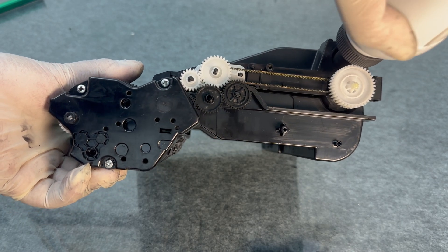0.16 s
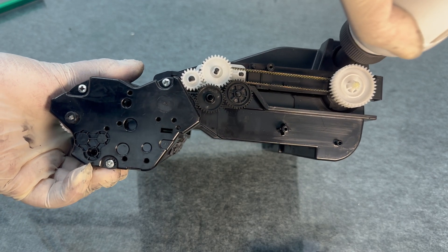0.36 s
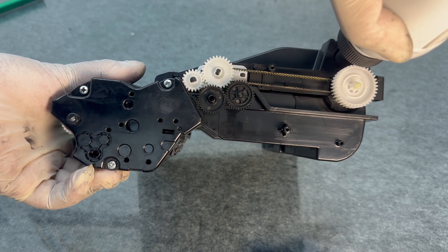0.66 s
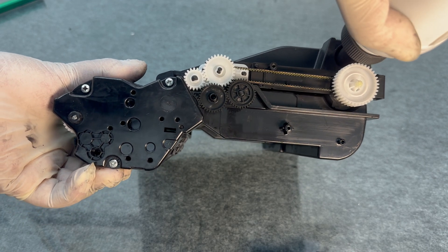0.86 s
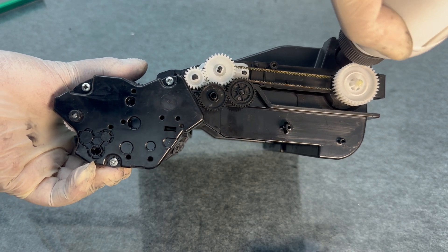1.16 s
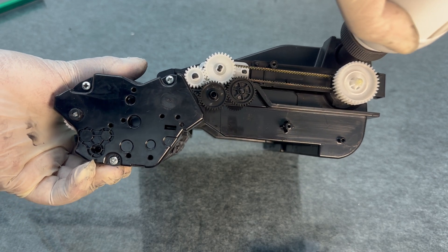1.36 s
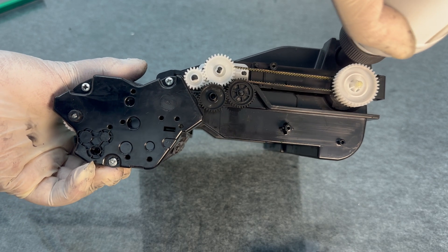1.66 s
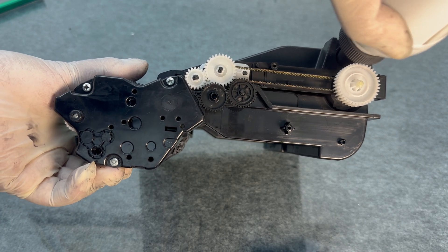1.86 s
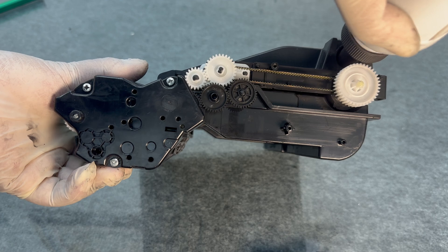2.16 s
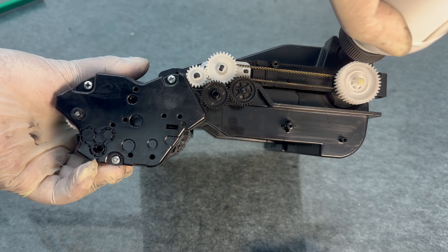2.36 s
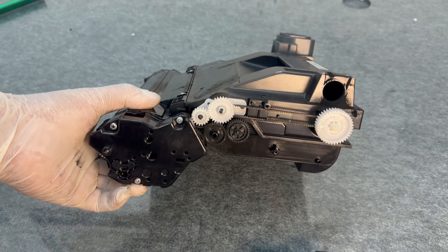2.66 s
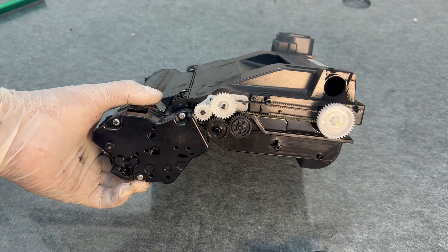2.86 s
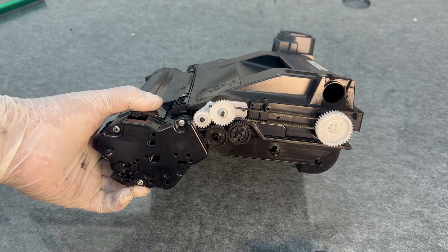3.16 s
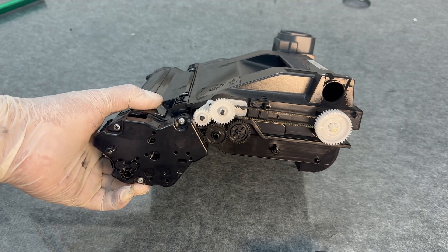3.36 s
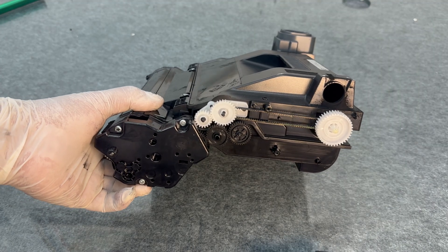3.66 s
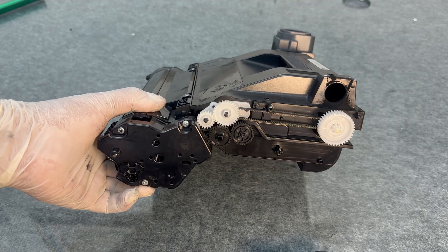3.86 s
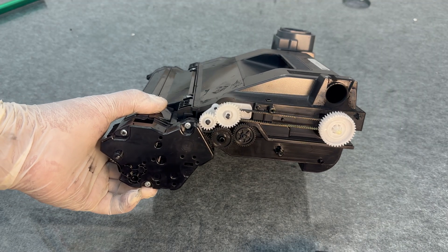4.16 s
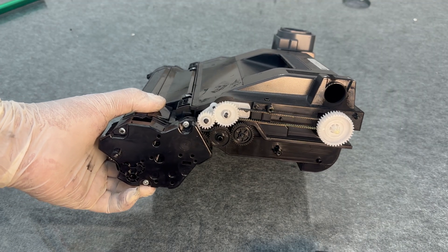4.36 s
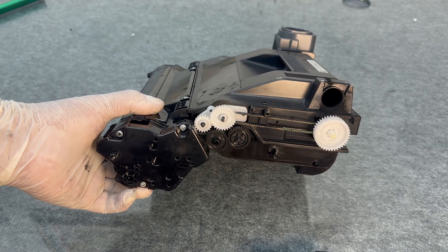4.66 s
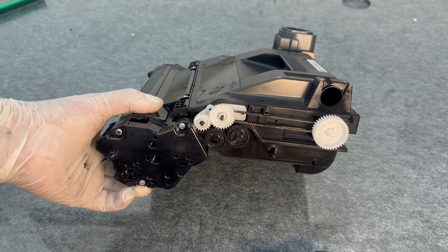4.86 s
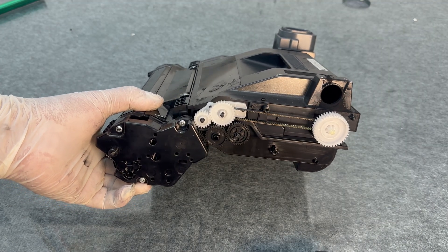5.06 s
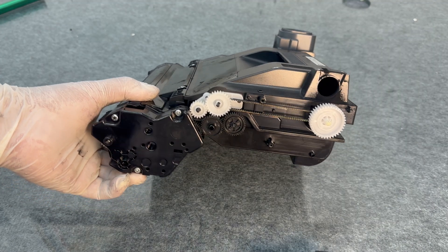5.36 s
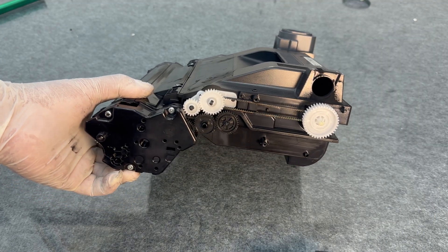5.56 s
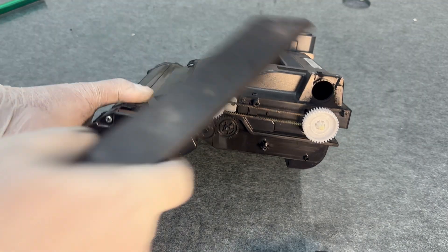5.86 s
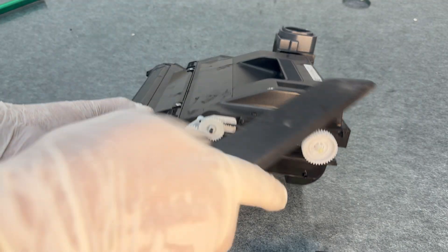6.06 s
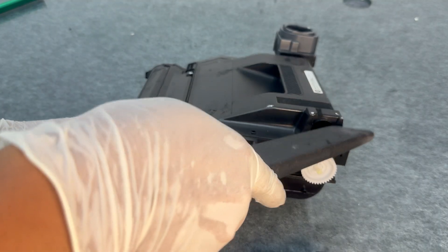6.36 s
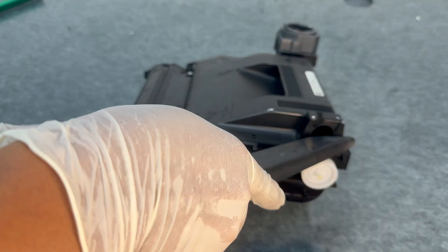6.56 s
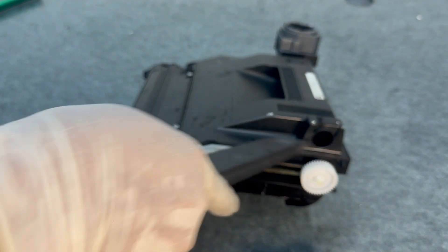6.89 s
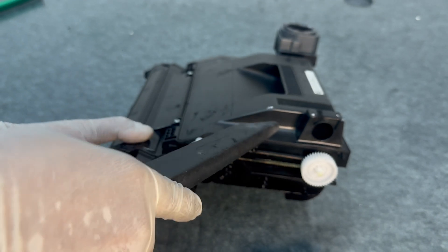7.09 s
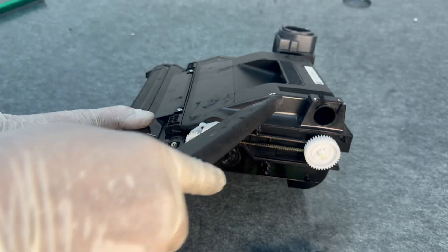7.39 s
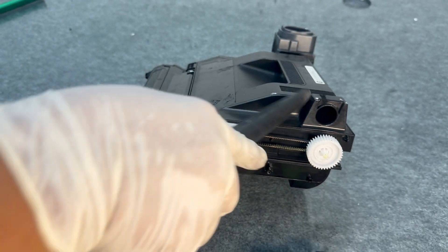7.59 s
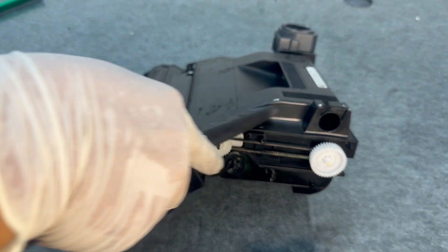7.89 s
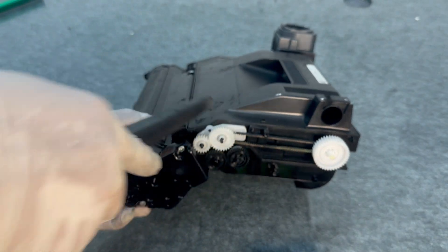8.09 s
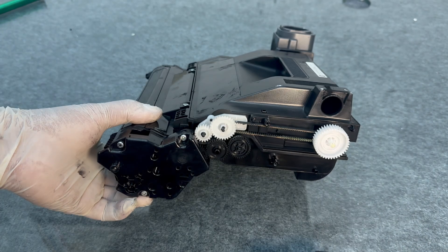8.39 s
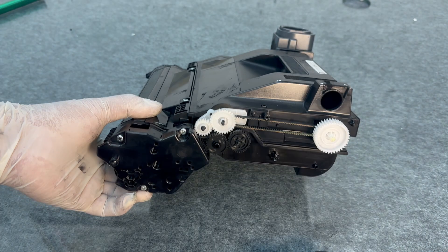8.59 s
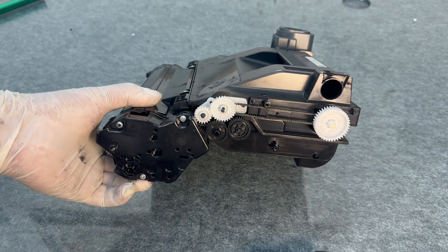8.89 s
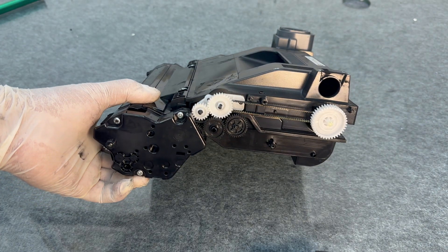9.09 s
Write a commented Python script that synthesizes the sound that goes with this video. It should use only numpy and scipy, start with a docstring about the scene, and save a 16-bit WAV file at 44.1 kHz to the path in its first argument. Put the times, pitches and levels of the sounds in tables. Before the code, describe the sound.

Light, quick plastic knocks of a bottle being shaken, followed by a small vacuum clicking on and running with rushing air.

```python
"""First a plastic toner bottle is shaken into a printer cartridge in a small room: each stroke knocks
it against the filler neck and it falls back, mostly more softly. A few dull handling bumps follow.
Then a small vacuum cleaner clicks on; its motor whines up to speed and air rushes through the hose.
Its narrow nozzle passes twice close over the cartridge, hissing and drawing in powder.
One last bump comes near the end, with the motor still running."""
import sys
import numpy as np
from scipy import signal
from scipy.fft import rfft, irfft, next_fast_len
from scipy.io import wavfile
from scipy.ndimage import uniform_filter1d, map_coordinates

SR = 44100
rng = np.random.default_rng(int(sys.argv[2]) if len(sys.argv) > 2 else 0)


def wav_out(sig):
    """Save sig, one row per channel (or a flat mono array), as 16-bit PCM at SR to the path in sys.argv[1]."""
    wavfile.write(sys.argv[1], SR, np.round(np.clip(np.atleast_2d(sig).T, -1, 1) * 32767).astype(np.int16))


N = 407043

# tones of the motor's whine: cycles_per_turn, speeding_up_db, full_speed_db, roughness_rad
MOTOR_TONES = [(2, -57.5, -70, .15), (2.612, -59, -63, .15), (3, -61, -64, .1), (7, -68, -73, .8),
               (9, -57, -64, .75), (12, -60, -72, 1.1), (13, -70, -70, 1.2)]
# resonances of the motor housing: pitch_hz, width_hz, boost_db
HOUSING_PEAKS = [(510, 30, 14), (632, 49, 10.5), (864, 19, 11), (906, 61, 7), (1710, 130, -1),
                 (2330, 120, 5), (2676, 200, 9.5), (2990, 410, 4.5), (3265, 48, 9), (3326, 47, 7),
                 (4170, 130, 9.5)]
# loud and dead spots that the hum passes on its way up: pitch_hz, width_hz, boost_db
HUM_PEAKS = [(200, 90, -22), (292, 45, 6), (333, 9, -5), (348.5, 12, 10), (362.3, 4, 8.5),
             (369.3, 4.5, -17), (372.7, 1.6, 2.5)]
# how near the nozzle is, as a change in loudness: time_s, level_db
NEARNESS = [(4.3, -2.5), (5.05, -1), (5.45, -4), (5.9, -2.5), (6.5, 3.5), (7.05, 0), (7.55, 0),
            (8.05, -0.1), (8.6, -5), (9.23, -6.5)]
# how far the nozzle points at the listener: time_s, share_0_to_1
FACING = [(5.6, 0.3), (6.15, 0.95), (6.9, 0.23), (7.1, 0.7), (7.6, 0.74), (8.2, 0.58), (9.23, 0.3)]
# roar of the exhaust: pitch_hz, level_db
EXHAUST_ROAR = [(40, -22), (100, -12.5), (170, -2.5), (240, -3), (320, -0.5), (450, 3), (600, -3),
                (780, -4.5), (1050, -2), (1400, -8.5), (2200, -25.5), (5000, -66)]
# hiss of the hose: pitch_hz, level_db
HOSE_HISS = [(600, -38), (1400, -2.5), (1900, 1.5), (2700, 2.5), (3400, 1), (4400, 0.5), (5800, -3.5),
             (7000, -8), (9000, -21.5), (15000, -49)]
# resonances along the nozzle tube: pitch_hz, width_hz, boost_db
TUBE_PEAKS = [(1070, 350, -18), (1787, 340, 10.5), (2620, 700, 4), (3400, 610, 7.5), (4130, 300, 7),
              (5300, 1300, 7), (5960, 440, 3), (7500, 400, -3), (8400, 380, -25)]
# fizz of the nozzle: pitch_hz, level_db
NOZZLE_FIZZ = [(3000, -23), (6500, -1), (8500, -2), (10500, -7.5), (13000, -16.5), (15700, -54)]
# thin, very high hiss of the nozzle's slot: pitch_hz, level_db
SLOT_HISS = [(7000, -19), (10500, -7), (12000, 2), (14500, 1), (15700, 1)]
# rise and fall of the highest hiss: time_s, level_db
TREBLE = [(4.24, -86), (5.03, -64.5), (5.45, -68), (6.15, -52.5), (6.55, -60), (7.3, -59.5), (8.05, -54.5),
          (8.55, -64), (9.23, -76.5)]
# the nozzle closes on the filler hole, then on the ribs: start_s, length_s, level_db, gulp_db
PASSES = [(6.635, 0.28, -34, 3), (7.695, 0.29, -34, 7)]
# air rushing over the filler hole: pitch_hz, level_db
HOLE_AIR = [(600, -45), (1080, -4.5), (1420, -18), (1850, -15), (2300, -16), (3400, 0), (4200, -7.5),
            (5700, 2.5), (7000, -6), (8400, -9), (11000, -12.5), (15500, -18)]
# nozzle resonances over the hole: pitch_hz, width_hz, boost_db
HOLE_PEAKS = [(1830, 250, 12.5), (2620, 260, 5), (3330, 250, 0.5), (5200, 160, 4), (5500, 200, -8),
              (8060, 320, 3.5), (8700, 360, -1)]
# air rushing over the ribs: pitch_hz, level_db
RIBS_AIR = [(550, -40), (950, -0.5), (1500, -6), (2200, -2.5), (2560, -4), (2950, -3.5), (3800, 2),
            (4700, 3.5), (6400, -0.5), (9000, -9), (15500, -30)]
# nozzle resonances over the ribs: pitch_hz, width_hz, boost_db
RIBS_PEAKS = [(2180, 400, 7.5), (2840, 430, 6.5), (3900, 400, 5.5), (4700, 280, 3), (5760, 280, 0.5)]
# brief whistles of air: middle_s, length_s, pitch_hz, width_hz, level_db
WHISTLES = [(4.22, 0.09, 1780, 80, -52.5), (4.256, 0.12, 2250, 120, -55), (6.444, 0.53, 5780, 300, -48),
            (6.662, 0.13, 5200, 240, -37.5), (6.731, .25, 5800, 240, -38), (6.779, 0.14, 7530, 350, -37.5),
            (6.78, 0.18, 8650, 350, -40.5), (7.729, 0.14, 3670, 480, -30),
            (7.71, 0.053, 4650, 261.7, -33.5), (7.86, .26, 3740, 240, -47)]
# snaps of the switch and the motor's brushes: start_s, level_db
SWITCH_SNAPS = [(4.091, -50.5), (4.11, -49.5), (4.126, -60)]
# tone colour of those snaps: pitch_hz, level_db
SPARK = [(600, 9.5), (1700, 2), (3500, 1), (6000, 0.5), (9000, -9.5), (15500, -28)]
# strokes of the bottle: start_s, knock_db, fall_back_after_s, fall_back_db
STROKES = [(0.119, -60, 0.075, -49.5), (0.268, -37.5, 0.067, -47), (0.405, -43, 0.065, -56.5),
           (0.53, -42.5, 0.06, -62), (0.662, -43, 0.056, -56.5), (0.79, -46, 0.038, -71),
           (0.919, -50, 0.047, -63), (1.048, -48, 0.045, -52), (1.159, -43, 0.06, -50.5),
           (1.292, -39.5, 0.07, -55), (1.427, -39.5, 0.063, -52.5), (1.556, -40.5, 0.051, -58),
           (1.827, -41, 0.065, -55.5), (1.955, -39.5, 0.076, -58), (2.089, -39.5, 0.066, -47),
           (2.226, -38, 0.072, -52.5), (2.36, -40, 0.07, -56)]
# the bottle neck slips in the hole: start_s, squeak_db, scrape_db
SLIPS = [(0.059, -53.5, -63.5), (0.086, -49, -64), (1.012, -70, -59), (1.031, -53.5, -59),
         (1.747, -56, -59.5), (1.816, -51, -54)]
# ringing of the bottle wall (a fade is a drop of 60 dB): pitch_hz, level_db, fade_s
BOTTLE_WALL = [(890, -6, 0.038), (1266, -11, 0.031), (1545, -8.5, 0.019), (2013, 0.5, 0.016),
               (2137, 3, 0.014), (2374, 3, 0.012), (2770, -7.5, 0.0075)]
# ringing of the hollow cartridge: pitch_hz, level_db, fade_s
CARTRIDGE_BODY = [(133.3, -3, 0.087), (209.3, 4.5, 0.042), (249.4, 1, 0.04), (359.5, 7, 0.035),
                  (541, -3, 0.039)]
# snap of plastic on plastic: pitch_hz, level_db
PLASTIC_SNAP = [(400, -9), (1200, 7.5), (2300, 9.5), (3800, 2.5), (5600, -2.5), (7000, -10.5),
                (9000, -18.5), (12000, -44), (16000, -52)]
# bumps of handling and of the vacuum starting: start_s, thump_db, rattle_db, fade_s, cutoff_hz
BUMPS = [(3.228, -54, -53, 0.24, 4480), (3.323, -54, -67, 0.49, 6000), (3.796, -59, -50, 0.31, 4460),
         (4.104, -38, -42.5, 0.65, 7000), (9.104, -35.5, -37.5, 0.3, 4026)]
# low ringing of table and casing: pitch_hz, level_db, fade_s
THUMP = [(103, 2.5, 0.44), (132, -5, .4), (202, -3, .4), (223.6, 2, 0.33)]
# loose rattle in a bump: pitch_hz, level_db
RATTLE = [(80, -27), (220, 9), (550, 2.5), (1000, -1.5), (1800, -8), (4000, -19), (8000, -22), (15000, -35)]
# how long the room's echo lasts: pitch_hz, fade_s
ECHO_FADE = [(150, 0.28), (600, 0.22), (2200, 0.24), (6000, 0.24), (14000, 0.23)]
# strength of the echo: pitch_hz, level_db
ECHO_LEVEL = [(150, -11.5), (500, -7.5), (1100, -7), (1600, -3.5), (2300, -4), (3500, -7), (9000, -9)]
# background noise of the room: pitch_hz, level_db
ROOM_NOISE = [(20, -34), (31, -14), (45, -4.5), (70, -11.5), (140, -13.5), (270, -11.5), (520, -22.5),
              (1100, -29), (2200, -39.5), (4400, -47), (4800, -50), (5500, -49.5), (9000, -53),
              (13900, -54), (15500, -57)]
# faint whistles in that noise: pitch_hz, width_hz, boost_db
ROOM_PEAKS = [(4700, 60, 12), (5290, 80, 11)]

ON_S, FIRST_HZ, FULL_HZ = 4.09, 89, 372.9  # the motor's start time, first speed and full speed


def vacuum():
    """The motor jumps to a first speed, then climbs toward full speed and pulls the air along."""
    since_on = np.maximum(np.arange(N) / SR - ON_S, 0)
    climb_left = 0.537 * np.exp(-since_on / 0.251) + 0.463 * np.exp(-since_on / 0.488)  # quick + slow
    speed_hz = FULL_HZ - (FULL_HZ - FIRST_HZ) * climb_left
    near_db = over_time(NEARNESS)
    fade_in = np.minimum(since_on / 0.084, 1)
    return switch() + fade_in * (motor(speed_hz, near_db) + airflow(speed_hz, near_db))


def motor(speed_hz, near_db):
    """The unbalanced rotor hums and the fan whines; each tone swells as it crosses a resonance."""
    turns = np.cumsum(speed_hz * (1 + 0.000632 * wobble(12))) / SR
    hum_db = -45.5 + boost(HUM_PEAKS, speed_hz) + 0.55 * near_db + 1.5 * wobble(8)
    hum = gain(hum_db) * np.sin(2 * np.pi * turns)
    pace = speed_hz / FULL_HZ  # share of full speed
    settled = pace ** 16
    whine = np.zeros(N)
    for cycles, rising_db, steady_db, roughness in MOTOR_TONES:
        flutter = roughness * (wobble(190) + wobble(55))  # swirling air blurs the tone
        level_db = rising_db + (steady_db - rising_db) * settled + boost(HOUSING_PEAKS, cycles * speed_hz)
        if cycles > 5:  # the high fan tones grow with nearness
            level_db += 2 + near_db
        flicker = unit_rms(gain(2 * wobble(24) + 2.8 * wobble(80)))
        flare_db = 3 * (1 - settled) * wobble(11)  # tones flare and sink while they glide
        whine += gain(level_db + flare_db) * flicker * np.sin(2 * np.pi * cycles * turns + flutter)
    return np.sqrt(2) * (hum * pace + whine * pace ** 1.3)


def airflow(speed_hz, near_db):
    """Exhaust, hose, nozzle and slot flutter together; slow or distant air is softer and duller."""
    pace = speed_hz / FULL_HZ
    facing = np.clip(over_time(FACING), 0, 1)
    treble_db = over_time(TREBLE)
    roar_db = -44 + 0.57 * near_db - 5 * (1 - facing) + 0.28 * wobble(25)
    roar = gain(roar_db) * pace ** 0.39 * standing_waves(noise(EXHAUST_ROAR))
    hose = standing_waves(noise(HOSE_HISS))
    hollow = unit_rms(filtered(hose, lambda hz: gain(boost(TUBE_PEAKS, hz))))
    dull = filtered(hose, lambda hz: 1 / (1 + (hz / 3600) ** 4))
    brightness = np.clip(pace ** 2 + 0.05 * near_db, 0, 1)
    turned_away = brightness * hose + (1 - brightness) * dull
    blend = facing * hollow + (1 - facing) * turned_away
    hiss = gain(-45 + 0.93 * near_db) * pace ** 1.77 * blend
    fizz_db = -48.5 + 0.16 * near_db + 0.46 * (treble_db - treble_db.max())
    fizz = gain(fizz_db) * pace * standing_waves(noise(NOZZLE_FIZZ))
    slot = gain(treble_db - 3.5) * standing_waves(noise(SLOT_HISS))
    return gain(0.55 * wobble(18)) * (roar + hiss + fizz + slot)


def nozzle(one_pass, spectrum, peaks, grain_db):
    """Air and ticking powder grains squeeze through a gap and sound the nozzle's resonances."""
    start_s, length_s, level_db, gulp_db = one_pass
    t = np.arange(N) / SR - start_s
    grains = (rng.random(N) < 500 / SR) * rng.standard_normal(N)  # about 500 a second
    jet = rng.standard_normal(N) + gain(grain_db) * unit_rms(grains)
    jet = filtered(jet, lambda hz: gain(at_pitch(spectrum, hz) + boost(peaks, hz)))
    gap_db = np.minimum(234 * t, -13 * t) - 210 * np.maximum(t - length_s, 0)  # closes, eases, opens
    gulp = np.exp(-((t - 0.054) / 0.038) ** 2)  # loose powder goes in just after the gap closes
    return gain(level_db + gap_db + gulp_db * gulp + 1.13 * wobble(90)) * standing_waves(jet)


def standing_waves(sound):
    """Hose and walls make some pitches louder and others softer, in a slowly shifting pattern."""
    hz, _, bands = signal.stft(sound, SR, nperseg=2048)

    def patches(height, frames):
        speckle = rng.standard_normal(bands.shape)
        return unit_rms(uniform_filter1d(uniform_filter1d(speckle, height, 0), frames, 1))

    narrow = rng.standard_normal((len(hz), 1)) + patches(height=3, frames=22)
    broad = patches(height=13, frames=16)
    narrow_db = narrow * at_pitch([(1000, 1.7), (4000, 1.6), (10000, 0.9)], hz)[:, None]
    broad_db = broad * at_pitch([(700, 0), (2500, 1.3), (8000, 1.3), (14000, 0.8)], hz)[:, None]
    return unit_rms(signal.istft(bands * gain(narrow_db + broad_db), SR, nperseg=2048)[1][:N])


def whistles():
    """Air sings in the starting fan and on plastic edges: narrow bands of noise swell and fade."""
    out = np.zeros(N)
    for middle_s, length_s, pitch_hz, width_hz, level_db in WHISTLES:
        swell = np.hanning(round(length_s * SR))
        band = filtered(rng.standard_normal(SR), lambda hz: resonance(hz, pitch_hz, width_hz))
        add(out, middle_s - length_s / 2, gain(level_db) * swell * unit_rms(band[:len(swell)]))
    return out


def switch():
    """The switch snaps and the motor's brushes spark: bright bursts, smeared by distance."""
    out, t = np.zeros(N), np.arange(SR // 3) / SR
    for start_s, level_db in SWITCH_SNAPS:
        add(out, start_s, gain(level_db) * fade(t, 0.32) * noise(SPARK, len(t)))
    return out


def bottle():
    """Each stroke knocks and falls back; now and then the neck slips with a squeak."""
    out, t = np.zeros(N), np.arange(SR // 3) / SR
    for start_s, knock_db, back_s, back_db in STROKES:
        add(out, start_s, knock(knock_db))
        add(out, start_s + back_s, knock(back_db))
    for start_s, squeak_db, scrape_db in SLIPS:
        scrape = gain(scrape_db) * noise(PLASTIC_SNAP, len(t)) * fade(t, 0.045) * rise(t, 0.0038)
        squeak = gain(squeak_db) * ring([(860, 0, 0.038)], t, rise_s=0.00032)
        add(out, start_s, with_echo(squeak + scrape, delay_s=0.011))
    return out


def knock(level_db):
    """A contact snaps twice and rings the bottle wall and hollow cartridge; soft ones are duller."""
    t = np.arange(SR // 3) / SR
    softer_db = max(-43 - level_db, 0)  # how far below a firm stroke
    body_db = level_db - 3 + 0.66 * softer_db
    snap_db = level_db - 7 - 0.49 * softer_db
    wall = ring(BOTTLE_WALL, t, rise_s=0.0011)
    body = ring(CARTRIDGE_BODY, t, rise_s=0.0046)
    out = gain(level_db - 1) * wall / np.abs(wall).max()
    add(out, 0.002, gain(body_db) * body / np.abs(body).max())
    sifting = gain(-14.5) * fade(t, 0.1)  # powder settles after the snap
    out += gain(snap_db) * noise(PLASTIC_SNAP, len(t)) * (fade(t, 0.018) + sifting) * rise(t, 0.00087)
    add(out, 0.0035, gain(snap_db - 6) * noise(PLASTIC_SNAP, len(t)) * fade(t, 0.015))
    return with_echo(out, delay_s=0.012)


def bumps():
    """Table and casing give a low thump under a short, loose rattle."""
    out, t = np.zeros(N), np.arange(SR // 2) / SR
    for start_s, thump_db, rattle_db, fade_s, cutoff_hz in BUMPS:
        thump = gain(thump_db - 1) * ring(THUMP, t, rise_s=0.013)
        rattle = gain(rattle_db + 0.75 * wobble(190, len(t))) * noise(RATTLE, len(t)) * rise(t, 0.011)
        rattle = filtered(rattle, lambda hz: 1 / np.sqrt(1 + (hz / cutoff_hz) ** 4))
        add(out, start_s, (thump + rattle) * fade(t, fade_s))
    return out


def with_echo(sound, delay_s):
    """The nearest wall answers late, and each pitch dies away at its own speed."""
    hz, t, bands = signal.stft(rng.standard_normal(len(sound)), SR, nperseg=256)
    tail = signal.istft(bands * fade(t, at_pitch(ECHO_FADE, hz)[:, None]), SR, nperseg=256)[1]
    tail = filtered(tail / np.linalg.norm(tail), lambda hz: gain(at_pitch(ECHO_LEVEL, hz)))
    delayed = np.pad(sound, (round(delay_s * SR), 0))
    return sound + signal.fftconvolve(delayed, tail)[:len(sound)]


def room_tone():
    """A quiet, low rush with two faint, high whistles in it."""
    level_db = -65 + 0.14 * wobble(6.5)
    return gain(level_db) * filtered(noise(ROOM_NOISE), lambda hz: gain(boost(ROOM_PEAKS, hz)))


def ring(tones, t, rise_s):
    """A struck object's fading tones, a little different in pitch and strength each time."""
    out = np.zeros(len(t))
    for hz, level_db, fade_s in tones:
        detune, extra_db = rng.normal(0, 0.01), rng.normal(0, 1)
        out += gain(level_db + extra_db) * fade(t, fade_s) * np.sin(2 * np.pi * hz * (1 + detune) * t)
    return out * rise(t, rise_s)


def noise(spectrum, size=N):
    """Noise of strength 1, coloured by a (pitch_hz, level_db) table."""
    return unit_rms(filtered(rng.standard_normal(size), lambda hz: gain(at_pitch(spectrum, hz))))


def wobble(rate_hz, size=N):
    """A smooth curve through rate_hz random values a second."""
    return map_coordinates(rng.standard_normal(4096), [np.arange(size) * rate_hz / SR], mode="wrap")


def filtered(sound, response):
    """Multiply each frequency in the sound by response(hz)."""
    size = next_fast_len(len(sound) + 8192)
    return irfft(rfft(sound, size) * response(np.fft.rfftfreq(size, 1 / SR)), size)[:len(sound)]


def resonance(hz, pitch_hz, width_hz):
    """A hill of height 1 around one pitch."""
    return 1 / (1 + (2 * (hz - pitch_hz) / width_hz) ** 2)


def boost(peaks, hz):
    """Decibels that resonances add at each frequency."""
    return sum(db * resonance(hz, pitch_hz, width_hz) for pitch_hz, width_hz, db in peaks)


def at_pitch(table, hz):
    """Read between (pitch_hz, value) rows, with octaves evenly spaced."""
    pitches, values = np.transpose(table)
    return np.interp(np.log(hz + 1), np.log(pitches + 1), values)


def over_time(table):
    """Turn (time_s, value) rows into one value per sample."""
    return np.interp(np.arange(N) / SR, *np.transpose(table))


def rise(t, rise_s):
    """Climb from 0 toward 1."""
    return 1 - np.exp(-t / rise_s)


def fade(t, fade_s):
    """Drop by 60 dB every fade_s."""
    return gain(-60 * t / fade_s)


def gain(db):
    """Turn decibels into a multiplier."""
    return 10 ** (np.asarray(db) / 20)


def unit_rms(sound):
    """Scale to an average strength (rms) of 1."""
    return sound / np.sqrt(np.mean(sound ** 2) + 1e-20)


def add(track, start_s, sound):
    """Mix a sound into a track."""
    start = max(round(start_s * SR), 0)
    part = track[start:start + len(sound)]
    part += sound[:len(part)]


def scene():
    """Vacuum, bottle and bumps over the room tone, alike in both channels."""
    over_hole, over_ribs = PASSES
    mono = vacuum()
    mono += nozzle(over_hole, HOLE_AIR, HOLE_PEAKS, grain_db=-14)
    mono += nozzle(over_ribs, RIBS_AIR, RIBS_PEAKS, grain_db=-19)
    mono += room_tone() + bottle() + bumps() + whistles()
    return np.array([mono, mono])


def record(dry):
    """Cut away the very highest treble."""
    return np.array([filtered(channel, lambda hz: hz < 15750) for channel in dry])


dry = scene()
out = record(dry)
wav_out(out)
```